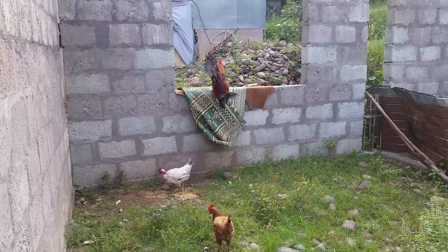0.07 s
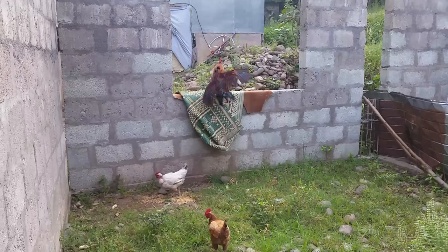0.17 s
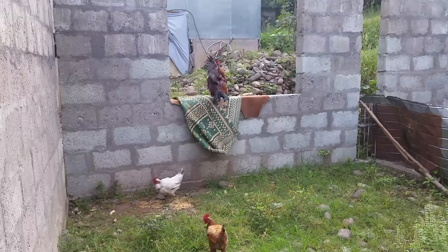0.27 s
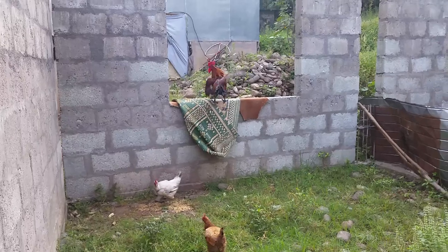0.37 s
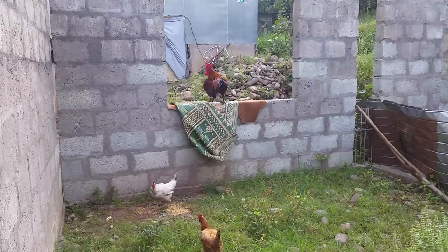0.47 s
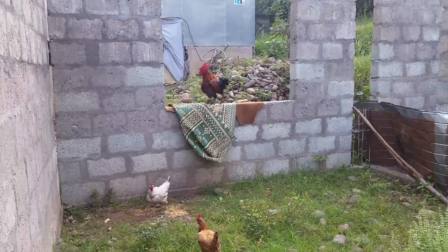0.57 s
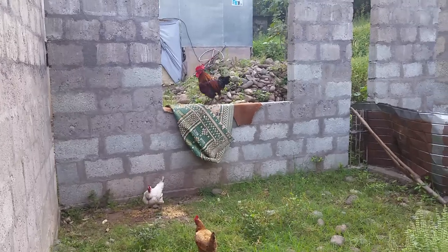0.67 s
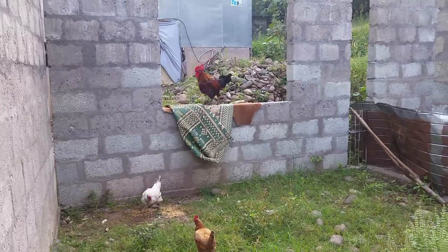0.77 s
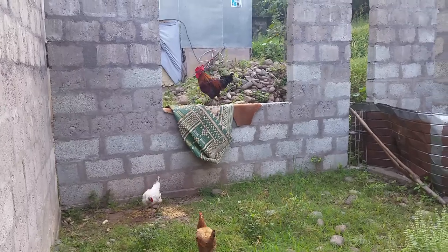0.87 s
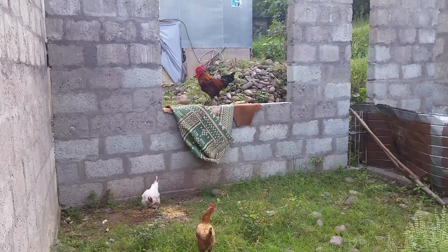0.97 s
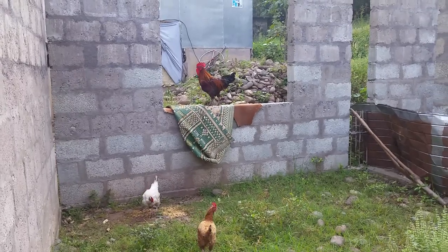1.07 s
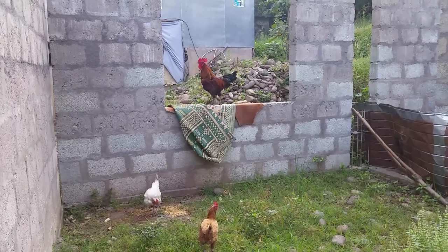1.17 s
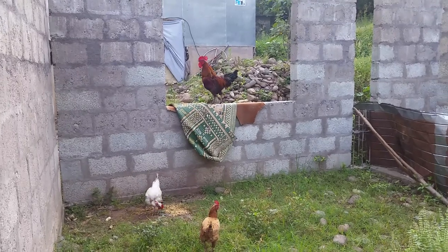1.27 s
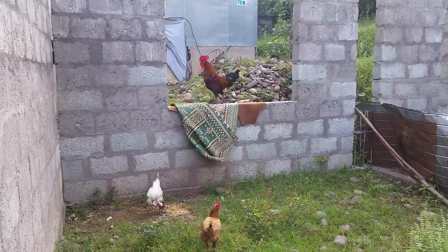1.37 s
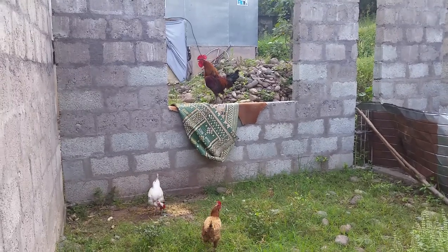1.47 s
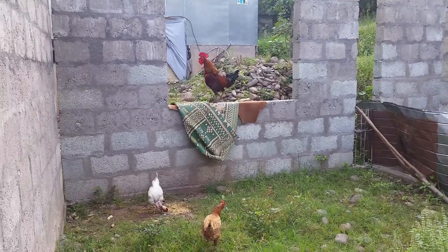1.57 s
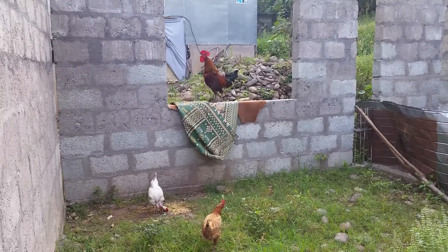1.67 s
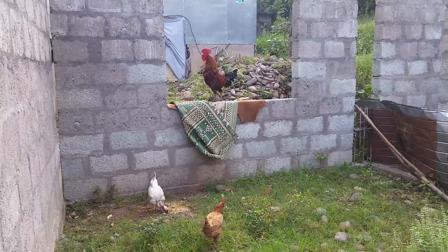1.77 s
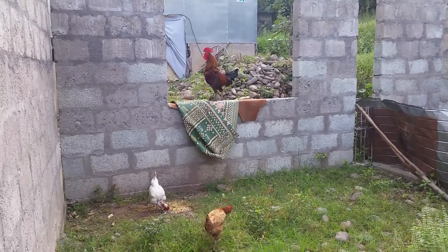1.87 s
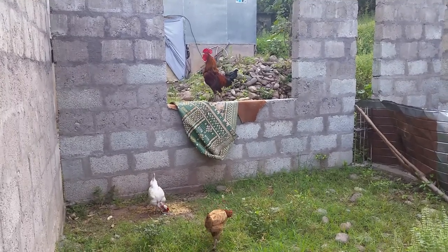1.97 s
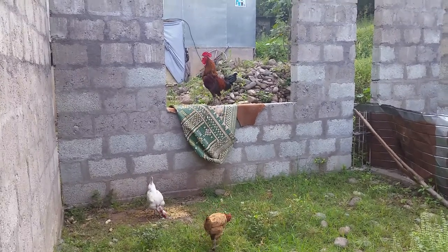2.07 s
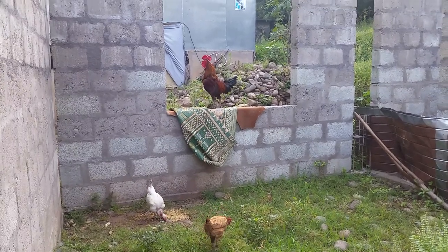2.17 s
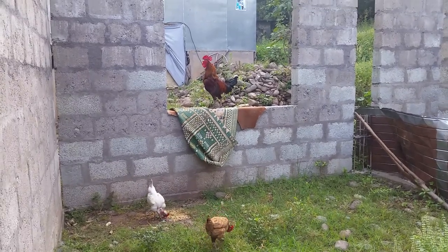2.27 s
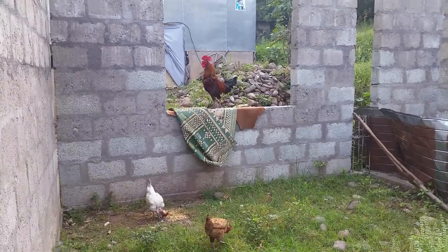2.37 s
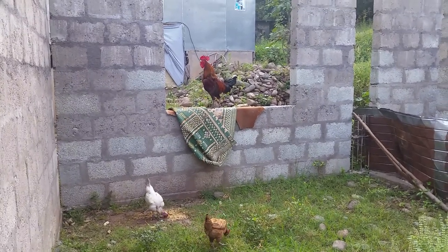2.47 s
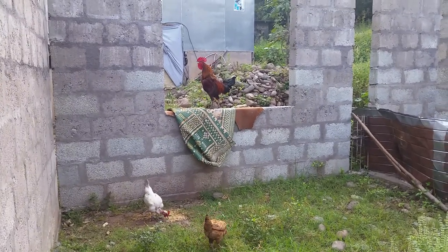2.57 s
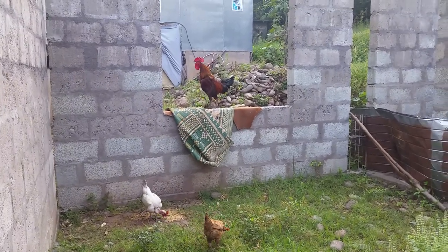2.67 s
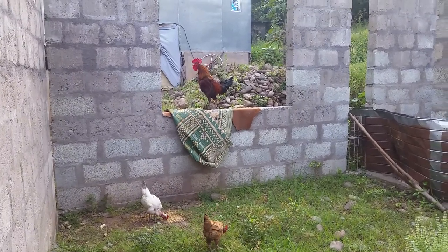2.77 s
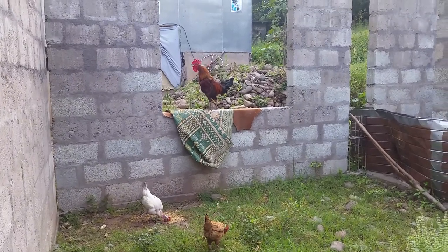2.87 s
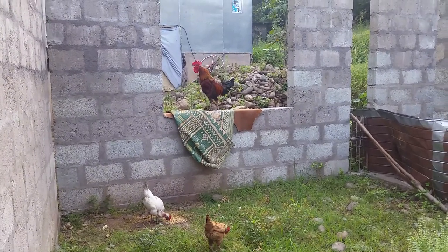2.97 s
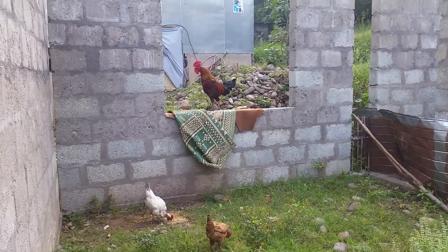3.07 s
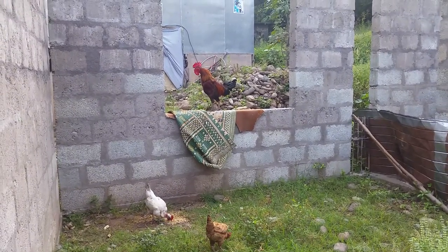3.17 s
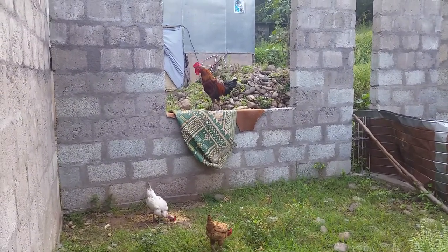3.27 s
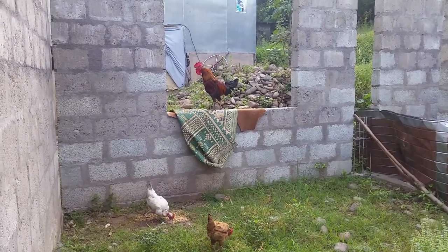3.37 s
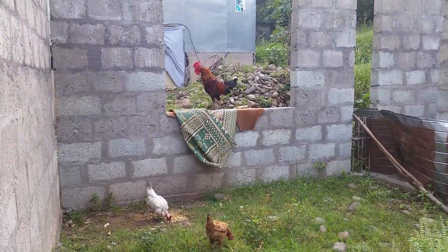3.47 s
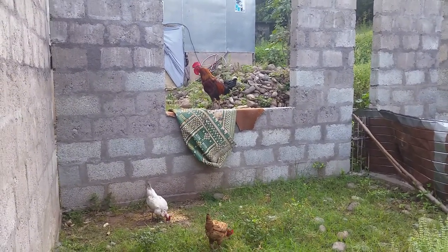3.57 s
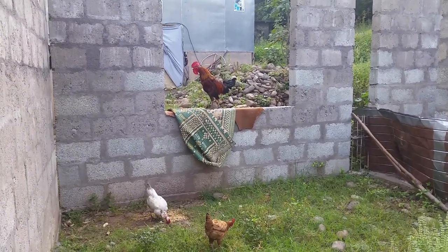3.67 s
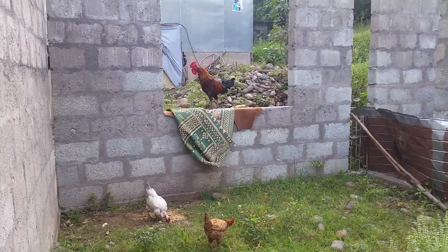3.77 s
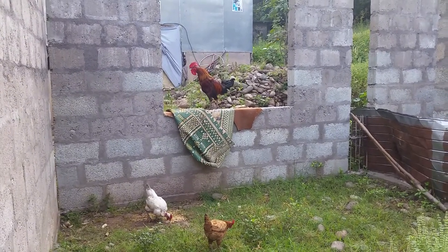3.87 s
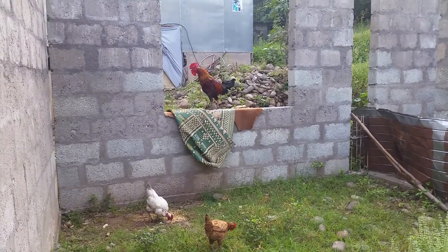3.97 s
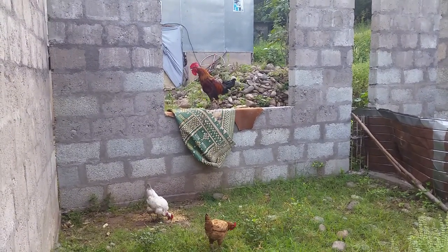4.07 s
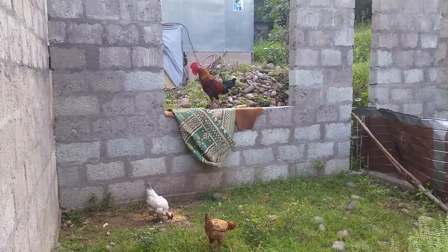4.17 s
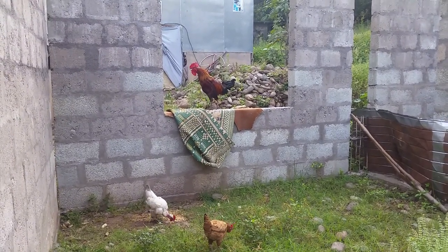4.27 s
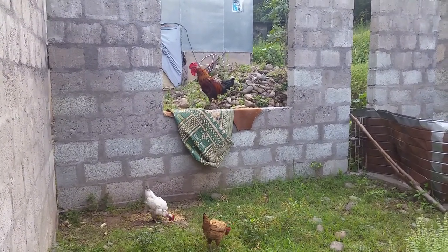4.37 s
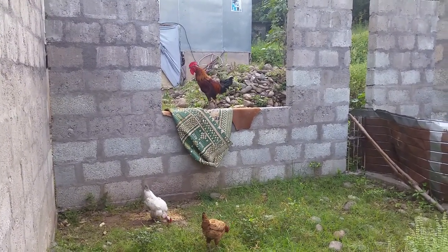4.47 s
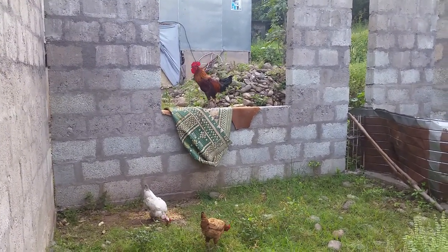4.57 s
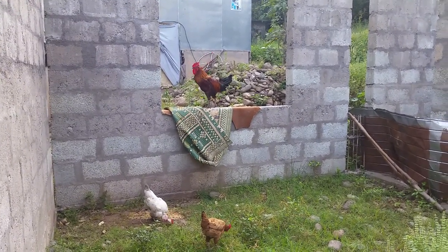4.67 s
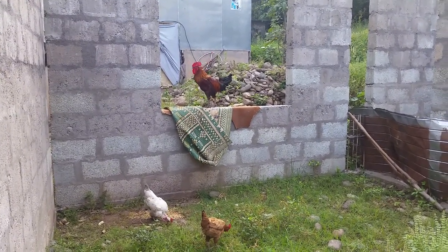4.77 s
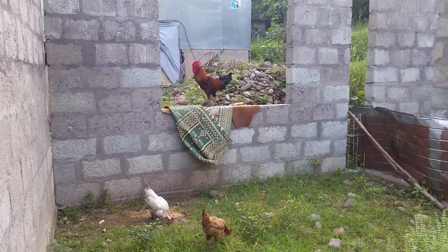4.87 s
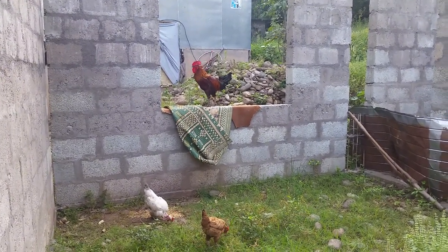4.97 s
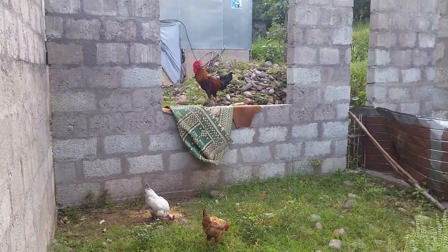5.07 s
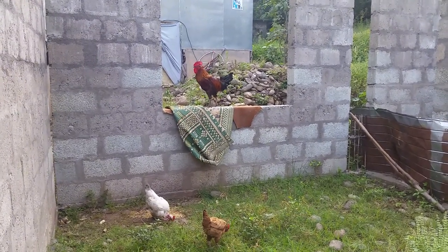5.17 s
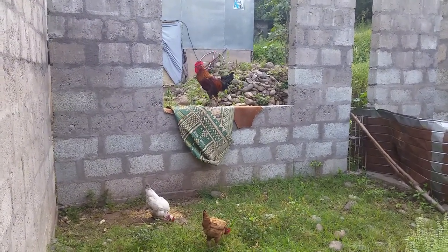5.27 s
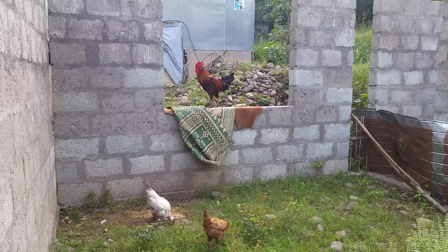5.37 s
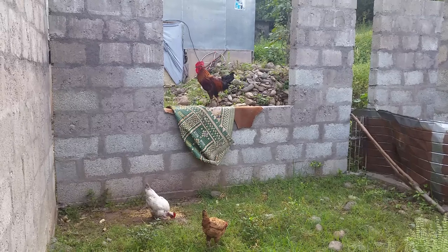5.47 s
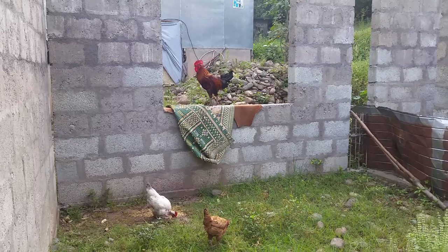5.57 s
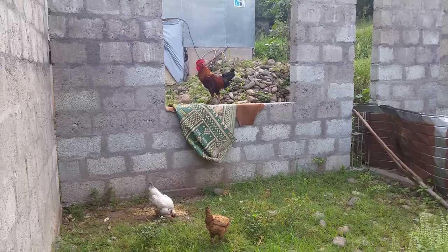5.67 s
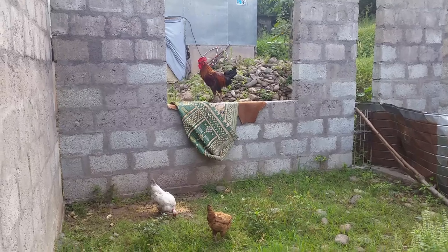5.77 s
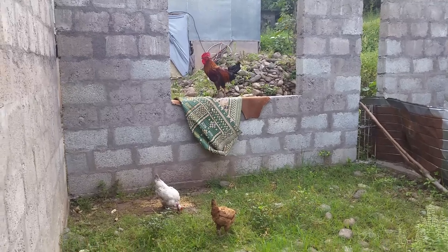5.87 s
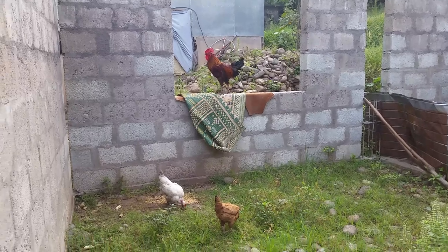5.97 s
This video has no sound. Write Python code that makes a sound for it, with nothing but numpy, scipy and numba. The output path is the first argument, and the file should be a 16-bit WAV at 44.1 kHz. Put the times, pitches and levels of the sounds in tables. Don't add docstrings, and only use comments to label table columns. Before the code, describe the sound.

Soft feather slaps, a short pause, then one loud hoarse rooster crow that rises, holds, sinks and gasps, echoing briefly off bare block walls.

```python
import sys
import numpy as np
from scipy import signal
from scipy.fft import rfft, irfft, next_fast_len
from scipy.io import wavfile
from scipy.ndimage import uniform_filter1d, minimum_filter1d, map_coordinates
from numba import njit

SR = 44100
rng = np.random.default_rng(int(sys.argv[2]) if len(sys.argv) > 2 else 0)


def to_wav(s):
    ch = np.atleast_2d(s).T
    pcm = np.round(np.clip(ch, -1, 1) * 32767)
    wavfile.write(sys.argv[1], SR, pcm.astype(np.int16))


def gain_from_db(level_db):
    decades = np.asarray(level_db, float) / 20
    return 10 ** decades


N = 265349
TIME = np.arange(N) / SR


def curve(table, column, off=-120.):
    s, v = np.array(table)[:, 0], np.array(table)[:, column]
    return np.interp(TIME, np.r_[s[0] - .006, s, s[-1] + .006], np.r_[off, v, off])


def pitch_curve(table):
    return np.interp(TIME, *np.array(table)[:, :2].T)


def smooth_amp(db, size):
    return uniform_filter1d(gain_from_db(db), size=size)


def span(start, end, size):
    return uniform_filter1d(1. * (TIME > start) * (TIME < end), size=size)


def unit(x):
    return x / np.sqrt(np.mean(x ** 2))


def walk(rate):
    hold = int(SR / rate)
    levels = np.repeat(rng.standard_normal(N // hold + 1), hold)
    return unit(uniform_filter1d(levels, hold)[:N])


def colour(x, gain):
    size = next_fast_len(N)
    hz = np.arange(size // 2 + 1) * SR / size
    return irfft(rfft(x, size) * gain(hz), size)[..., :N]


def ring(x, gain):
    size = next_fast_len(N)
    hz = np.arange(size // 2 + 1) * SR / size
    cepstrum = irfft(np.log(gain(hz) + 1e-6), size)
    cepstrum[1:size // 2] *= 2
    cepstrum[size // 2 + 1:] = 0
    return irfft(rfft(x, size) * np.exp(rfft(cepstrum)), size)[:N]


def spectrum(table):
    hz, db = np.transpose(table)
    return lambda f: gain_from_db(np.interp(np.log(f + 1), np.log(hz), db))


def tract(hz, modes):
    return np.sqrt(sum(gain_from_db(db) ** 2 / (1 + (2 * (hz - f) / w) ** 6) for f, w, db in modes))


def pipe(hz, modes):
    low_hz, high_hz, leak_db = 570, 3350, -24
    peaks = np.sqrt(sum(gain_from_db(db) ** 2 / (1 + (2 * (hz - f) / w) ** 2) ** 2 for f, w, db in modes))
    low = 1 / np.sqrt(1 + (low_hz / (hz + 1)) ** 24) + gain_from_db(leak_db) * (hz > 250)
    return peaks * low / np.sqrt(1 + (hz / high_hz) ** 12)


@njit
def fire(hz, scatter, chance):
    pulses, phase, cycle = np.zeros(len(hz) + 1), 0., 0
    for i in range(len(hz)):
        step = hz[i] * np.exp(scatter[i] * chance[cycle, 0]) / SR
        phase += step
        if phase >= 1:
            phase, cycle = phase - 1, cycle + 1
            size = np.exp(scatter[i] * chance[cycle, 1])
            early = min(phase / step, 1.)
            pulses[i] += size * early
            pulses[i + 1] += size * (1 - early)
    return pulses[:-1]


# f/Hz, level/dB (per Hz)
COUNTRY_HUSH = [(15, -57), (25, -18.5), (37, -16), (94, -3), (165, -1.5), (228, -2), (380, -2), (617, -2.5),
                (1060, -6.5), (1180, -6), (1960, -13.5), (2440, -16), (7550, -36.5), (15600, -27.5)]


def hush():
    base_db, settle_db, settle_s = -67, 4, 0.49
    lift_db, lift_from_s, lift_rise_s, lift_until_s, lift_close_s = 10, 1.5, 0.66, 5.377, 0.5
    mid, side = colour(rng.standard_normal((2, N)), spectrum(COUNTRY_HUSH))
    low = colour(mid, lambda f: (f > 60) & (f < 300))
    opening = 1 - np.exp(-np.maximum(TIME - lift_from_s, 0) / lift_rise_s)
    lift = opening * np.clip((lift_until_s - TIME) / lift_close_s, 0, 1)
    flicker_db = 0.4 * walk(5.6)
    level_db = base_db + settle_db * np.exp(-TIME / settle_s) + lift_db * lift + flicker_db
    gain = gain_from_db(level_db) / np.std(low)
    side = colour(side, spectrum([(100, -50), (1000, -32), (5000, -20)]))
    dull = spectrum([(25, -9), (55, 0), (2000, 0), (5000, -3), (9000, -11), (15000, -5)])
    return colour(gain * (mid + side * np.array([[1], [-1]])), dull)


@njit
def walls(x, lags, gain, damp):
    line, soft, out = np.zeros((8, 4096)), np.zeros(8), np.zeros((2, len(x)))
    for i in range(len(x)):
        total = 0.
        for k in range(8):
            soft[k] += (1 - damp) * (gain[k] * line[k, (i - lags[k]) & 4095] - soft[k])
            total += soft[k]
            out[k % 2, i] += soft[k]
        for k in range(8):
            line[k, i & 4095] = x[i] + soft[k] - total / 4
    return out


def wall_echo(bird):
    t60_s, damp, level_db = .29, .07, -19
    lags = rng.integers(500, 2600, 8)
    left, right = walls(bird + 1e-18, lags, gain_from_db(-60 * lags / SR / t60_s), damp)
    echo = left + right + .06 * (left - right) * np.array([[1], [-1]])
    return gain_from_db(level_db) * echo


# t/s, length/s, f/Hz, level/dB
BUSH_WHISTLE = (5.56, .19, 2400, -71)


def far_bird():
    start_s, length_s, hz, db = BUSH_WHISTLE
    phase = 2 * np.pi * np.cumsum(hz * (1 + .04 * walk(200) + .015 * walk(30))) / SR
    swell = np.sin(np.pi * np.clip((TIME - start_s) / length_s, 0, 1))
    return np.sqrt(2) * gain_from_db(db) * swell * np.cos(phase)


# t/s, peak level/dB
WING_SLAPS = [
    (0, -31.5),
    (0.08, -44),
    (0.176, -24),
    (0.29, -33.5),
    (0.346, -40),
    (0.426, -46),
    (0.625, -34),
]
# t/s, peak level/dB
CLAW_TICK = [
    (0.158, -40),
]


def wings():
    swell_s, dull_hz = 0.0122, 960
    air = colour(rng.standard_normal(N), lambda f: tract(f, [(dull_hz, 1.8 * dull_hz, 0)]))
    air = unit(air)
    out = np.zeros(N)
    for s, db in WING_SLAPS:
        swell = np.exp(-.5 * ((TIME - s - swell_s / 2) / swell_s) ** 2)
        out += gain_from_db(db - 21.0) * swell * air
    for s, db in CLAW_TICK:
        click = np.exp(-((TIME - s - .001) / 0.0004) ** 2)
        out += gain_from_db(db) * click * np.sin(2 * np.pi * 1400 * (TIME - s))
    return out


# t/s, level/dB
INDRAW_LEVEL = [
    (4.458, -33),
    (4.472, -33),
    (4.5, -41.5),
    (4.6, -40),
    (4.686, -38.5),
    (4.82, -43),
    (5.04, -48),
    (5.29, -71.5),
]
# f/Hz, width/Hz, level/dB
INDRAW_MODES = [(420, 90, -9), (690, 120, 4), (850, 300, -7), (1080, 160, -6), (1700, 800, -20),
                (3000, 2000, -32), (5500, 3000, -42), (13000, 3000, -42)]


def indraw():
    flaps = fire(np.full(N, 75.), np.ones(N), rng.standard_normal((N // 40, 2)) * [.25, .25])
    gate = unit(signal.lfilter([1], [1, -np.exp(-1 / (.004 * SR))], flaps))
    air = (5 + gate) * rng.standard_normal(N)
    scale = np.std(colour(air, lambda f: tract(f, INDRAW_MODES)))
    low = colour(air, lambda f: tract(f, INDRAW_MODES[:5])) / scale
    high = colour(air, lambda f: tract(f, INDRAW_MODES[5:])) / scale
    level_db = curve(INDRAW_LEVEL, 1)
    return gain_from_db(level_db) * low + smooth_amp(np.minimum(level_db, -39.0), 2200) * high


SYRINX_KINDS = {"clean": (.02, .04), "husky": (.045, .08), "lock": (.13, 0), "chaos": (.62, 0),
                "ripple": (.06, .12), "beat": (.14, .5), "broken": (.3, .22), "doubled": (.16, .28)}
# t/s, kind, level/dB (share of in-between pulses)
SYRINX_FLIPS = [(0, "chaos", 0.5), (1.666, "broken", -3.5), (1.694, "lock", -8), (1.714, "chaos", -1),
                (1.822, "chaos", 0), (1.968, "broken", -1.5), (2.008, "lock", -8.5), (2.052, "chaos", 0),
                (2.11, "chaos", -0.5), (2.198, "lock", -10.5), (2.266, "chaos", -2), (2.498, "lock", -10),
                (2.551, "chaos", 0), (2.642, "broken", -2.5), (2.672, "lock", -21),
                (2.695, "ripple", -24.5), (2.742, "beat", -22.5), (2.78, "beat", -15),
                (2.839, "clean", -51), (2.99, "husky", -47.5), (3.108, "clean", -24), (3.125, "clean", -7),
                (3.152, "doubled", -8.5), (3.237, "doubled", -3), (3.292, "chaos", -11.5),
                (3.306, "clean", -52.5), (3.7, "husky", -38), (3.861, "clean", -35.5), (3.96, "husky", -29),
                (4.054, "broken", -1.5), (4.077, "husky", -23.5), (4.16, "clean", -39),
                (4.33, "husky", -30.5), (4.451, "broken", -6.5)]


def flips(values):
    now = np.searchsorted([row[0] for row in SYRINX_FLIPS], TIME, side="right") - 1
    return uniform_filter1d(np.array(values, float)[np.maximum(now, 0)], size=int(.015 * SR))


# t/s, f/Hz, level/dB
FIRST_NOTE = [
    (1.643, 571, -52.5),
    (1.652, 575.1, -34),
    (1.693, 567.2, -30),
    (1.701, 574.7, -19.5),
    (1.74, 631.3, -17.5),
    (1.81, 608.1, -17),
    (1.826, 606.3, -20),
    (1.85, 607.3, -32),
    (1.915, 609.7, -40.5),
]
# t/s, f/Hz, level/dB
SECOND_NOTE = [
    [(1.947, 608, -22.5), (1.975, 639, -17), (2.03, 670, -12.5), (2.06, 629, -15), (2.094, 606.8, -20),
     (2.12, 735.3, -19), (2.19, 748, -13.5), (2.198, 717.5, -9)],
    [(2.204, 692.3, -10.5), (2.262, 690, -10.5), (2.285, 744, -14.5), (2.347, 688.5, -13),
     (2.43, 745, -14.5), (2.49, 678.2, -14.5), (2.53, 662.4, -10.5), (2.565, 670, -19),
     (2.63, 649.4, -39.5)],
]
# t/s, f/Hz, level/dB
THIRD_NOTE = [
    (2.638, 579.8, -33),
    (2.656, 586.5, -17.5),
    (2.678, 643, -12.5),
    (2.7, 660, -11),
    (2.797, 665.6, -10),
    (2.828, 647.5, -9.5),
]
# t/s, f/Hz, level/dB
FOURTH_NOTE = [
    (2.829, 745, -11.5),
    (2.865, 724, -9.5),
    (2.982, 725.1, -9.5),
    (2.998, 717.4, -12),
    (3.021, 716, -10),
    (3.148, 709.5, -10.5),
    (3.165, 705.4, -14),
    (3.285, 702.3, -12.5),
    (3.299, 678, -12.5),
]
# t/s, f/Hz, level/dB
LONG_NOTE = [
    (3.302, 643, -11),
    (3.31, 641.7, -12),
    (3.6, 631.5, -11),
    (3.854, 609, -12),
    (4.026, 589.1, -12),
    (4.049, 582, -12.5),
]
# t/s, f/Hz, level/dB
LAST_NOTE = [
    (4.051, 512.6, -18),
    (4.093, 504, -14),
    (4.146, 512.7, -13.5),
    (4.241, 496.9, -13),
    (4.262, 497.2, -15),
    (4.329, 486.9, -17.5),
    (4.408, 482.8, -14.5),
    (4.437, 474.4, -14),
    (4.464, 410.3, -25),
]
SYLLABLES = [FIRST_NOTE, *SECOND_NOTE, THIRD_NOTE, FOURTH_NOTE, LONG_NOTE, LAST_NOTE]
FULL_DB = -12
BREATH_LEVEL = [-56, -51.5, -50, -55, -67, -68, -58]
# f/Hz, level/dB
BREATH_COLOUR = [(1800, -30), (2300, 3), (3100, 4.5), (3700, -9.5), (4500, -15.5), (5300, -18.5),
                 (7000, -37)]
# from t/s, until t/s, f/Hz, width/Hz, level/dB
BEAK_RINGING = [
    (2.06, 2.566, 6020, 250.3, -68),
    (2.15, 2.561, 5950, 350.5, -69),
    (2.702, 2.874, 6110, 255, -64),
    (3.13, 3.313, 6158, 199, -63.5),
]


def breath(air, pulses, beat):
    slope, linger_s = 0.63, 0.04
    flow = 0
    for part, db in zip(SYLLABLES, BREATH_LEVEL):
        flow = flow + gain_from_db(db + slope * (curve(part, 2) - FULL_DB))
    linger = np.exp(-1 / (linger_s * SR))
    hiss = unit(colour(air[::-1], spectrum(BREATH_COLOUR)))
    out = signal.lfilter([1 - linger], [1, -linger], flow) * hiss
    for start, end, hz, width, db in BEAK_RINGING:
        rung = unit(colour(pulses, lambda f: tract(f, [(hz, width, 0)]) ** 2))
        out += gain_from_db(db) * span(start, end, 1300) * (1 + 0.28 * beat) * rung
    return out


def hoarse_trace(air):
    hoarse = unit(colour(air, lambda f: pipe(f, [(1420, 750, -8.0), (1030, 94, -4.0)])))
    return gain_from_db(-46) * (TIME > 2.8) * (TIME < 4.45) * hoarse


# t/s, f/Hz, level/dB
LONE_HALF = [
    [(2.63, 1710, -34.5), (2.645, 1358, -26.5), (2.654, 1097, -24.5), (2.662, 1141, -21),
     (2.674, 1227, -31.5)],
    [(2.652, 1783, -27.5), (2.675, 1894, -18.5), (2.72, 1925, -29), (2.79, 1866, -25.5),
     (2.825, 1820, -25.5), (2.86, 1800, -38.5)],
]
# t/s, f/Hz, level/dB
CHAOS_STRAYS = [
    [(1.947, 1247, -24), (1.957, 1073, -20), (1.972, 1195, -21.5), (1.992, 1242, -26.5)],
    [(1.948, 1812, -21.5), (1.968, 1827, -28), (1.988, 1900, -30), (1.996, 1880, -29.5)],
    [(1.965, 1576, -22.5), (2.0, 1639, -20.5), (2.022, 1656, -22)],
    [(2.043, 1949, -25), (2.055, 1875, -20), (2.075, 1830, -24.5)],
    [(2.044, 959, -22), (2.054, 950, -11.5), (2.062, 970, -23.5)],
    [(2.11, 1560, -21.5), (2.135, 1500, -22), (2.158, 1520, -22)],
    [(2.158, 1767, -27), (2.18, 1873, -20), (2.21, 1971, -24.5)],
    [(2.062, 1221, -24.5), (2.085, 1095, -16), (2.12, 1130, -23), (2.155, 1184, -24.5), (2.183, 1130, -20)],
    [(2.186, 1487, -21), (2.198, 1460, -15.5), (2.212, 1353, -25.5)],
    [(2.266, 1445, -22), (2.276, 1520, -16), (2.305, 1489, -18.5), (2.36, 1311, -24.5)],
    [(2.4, 1420, -23), (2.424, 1450, -15.5), (2.44, 1634, -20), (2.475, 1589, -26.5)],
    [(2.545, 1830, -22.5), (2.565, 1948, -24)],
]
# t/s, f/Hz, level/dB
FIRST_STRAYS = [
    [(1.644, 1850, -43.5), (1.66, 1612, -41), (1.69, 1655, -34)],
    [(1.652, 1177, -38), (1.662, 1130, -32), (1.692, 1136, -29), (1.703, 1160, -20), (1.716, 1170, -26)],
    [(1.71, 1423, -26), (1.725, 1538, -31.5), (1.77, 1500, -20), (1.8, 1467, -25), (1.83, 1566, -19.5),
     (1.842, 1550, -27.5)],
    [(1.798, 1170, -21), (1.808, 1130, -23), (1.818, 1080, -30.5), (1.835, 1152, -23), (1.85, 1137, -41),
     (1.915, 1135, -41)],
    [(1.662, 2850, -54), (1.7, 2900, -46), (1.75, 2800, -50), (1.8, 2950, -46), (1.84, 3000, -46),
     (1.87, 2950, -56)],
]
# t/s, f/Hz, level/dB
THIRD_STRAYS = [
    [(2.686, 2600, -46), (2.715, 2680, -41), (2.746, 2640, -44)],
    [(2.83, 642, -17), (2.842, 636, -20), (2.858, 630, -30)],
]
# t/s, f/Hz, level/dB
LAST_STRAYS = [
    [(4.052, 600, -24.5), (4.064, 643, -18.5), (4.078, 590, -30.5)],
    [(4.054, 1903, -21), (4.066, 1786, -25), (4.082, 1730, -30.5)],
    [(4.452, 1349, -31), (4.464, 1195, -27), (4.478, 1130, -34)],
    [(4.456, 897.6, -32), (4.47, 776, -29.5), (4.488, 747, -45)],
    [(4.462, 1877, -31), (4.49, 1930, -48), (4.525, 1970, -46)],
    [(4.442, 2935, -54), (4.47, 2920, -59), (4.51, 2880, -56.5)],
]


def lone_line(part, bend):
    phase = 2 * np.pi * np.cumsum(pitch_curve(part) * (1 + bend)) / SR
    return np.sqrt(2) * smooth_amp(curve(part, 2), 90) * np.cos(phase)


def second(beat):
    catch, arch_part = LONE_HALF
    locked = np.clip((TIME - 2.68) / .04, 0, 1)
    arch = lone_line(arch_part, .012 * walk(300) - .06 * locked * np.roll(beat, 480))
    arch = arch * (1 + .85 * locked * np.roll(beat, 220))
    jitter, flutter = .021 * walk(400), 1 + .45 * np.tanh(walk(90))
    strays = CHAOS_STRAYS + FIRST_STRAYS + THIRD_STRAYS + LAST_STRAYS
    stray = sum(lone_line(part, jitter) for part in strays)
    return lone_line(catch, .018 * walk(300)) + arch + flutter * stray


# f/Hz, width/Hz, level/dB
WINDPIPE_MODES = [
    [(690, 100, -5.5), (830, 67, -11), (1130, 130, 3), (1420, 120, -5), (1572, 79, 4.5), (1830, 29, 0.5),
     (2270, 200, -27.5), (2916, 35, -19)],
    [(393, 280, -16), (716, 140, 3.5), (984, 87, -9), (1127, 310, 2.5), (1457, 150, 5), (1679, 38, 5),
     (1844, 84, 5.5), (2055, 45, -9.5), (2860, 76, -23)],
]


def rasp(pulses, share, chaos):
    out = 0
    for parts, modes in zip((SYLLABLES[:1], SYLLABLES[1:]), WINDPIPE_MODES):
        push = uniform_filter1d(sum(gain_from_db(curve(part, 2)) for part in parts), size=90) * share
        scale = np.std(colour(pulses, lambda f: pipe(f, modes)))
        out = out + ring(pulses * push, lambda f: pipe(f, modes)) / scale
    strain = np.gradient(uniform_filter1d(walk(16), size=1500))
    bend = np.cumsum(chaos * strain) * .0011 * SR
    return map_coordinates(out, [np.arange(N) + bend], order=3)


# f/Hz, level/dB
PASS_BAND = [
    [(575, -31), (620, -16.5), (1150, -21), (1250, -34), (1800, -31)],
    [(610, -21), (680, -12), (750, -17), (1330, -16), (1390, -19.5), (1500, -19.5), (2000, -36.5),
     (2200, -49.5)],
    [(600, -27.5), (640, -6.5), (665, -7.5), (703, -16.5), (720, -22), (1320, -18.5), (1405, -14),
     (1432, -10), (1980, -33), (2150, -50), (2178, -60)],
    [(588, -24), (612, -10.5), (1190, -17), (1204, -38.5), (1218, -14), (1280, -22), (1745, -36.5),
     (1772, -17.5), (1800, -16), (1920, -27.5)],
    [(870, -29.5), (966, -38), (975, -22.5), (1020, -18), (1450, -17.5), (1520, -13.5), (1925, -15.5),
     (1945, -17), (1980, -31.5), (2036, -38.5)],
]


def strong_lines(pose, first, pitch):
    gain = spectrum(sorted(PASS_BAND[pose]))
    lines = np.array([gain((first + k) * pitch) for k in range(3)])
    return lines / np.sqrt(np.sum(lines ** 2, axis=0))


# f/Hz, level/dB
FIRST_BEAK = [(1350, -58), (2300, -14.5), (2950, -1.5), (3350, -33), (4620, -29), (5420, -21), (5900, -26),
              (6420, -43), (6950, -21.5), (7600, -43), (8300, -20), (8900, -32), (10200, -28.5),
              (10900, -54), (12100, -30.5), (13600, -48.5), (15600, -50)]
# f/Hz, level/dB
BEAK_COLOURS = [
    [(1350, -28.5), (2300, -4), (2530, -3.5), (3120, -1.5), (3600, -11.5), (4660, -36), (5470, -35),
     (6020, -29.5), (6350, -61.5), (6950, -63.5), (7200, -25.5), (8360, -19.5), (11200, -22.5),
     (12100, -36.5), (13300, -24), (14100, -38.5), (15600, -45.5)],
    [(1350, -53.5), (2300, -27), (2550, -10), (2790, -12.5), (2900, -1), (3300, -20), (5000, -49.5),
     (5720, -42), (6150, -23), (6500, -38.5), (7060, -52), (7800, -45.5), (8430, -21.5), (8700, -14.5),
     (10200, -32), (11000, -53.5), (11800, -36), (14000, -41.5), (14900, -28.5), (15600, -38.5)],
    [(1350, -26.5), (2420, -20.5), (2560, 1), (3250, -5), (4850, -32), (5400, -20), (5650, -15.5),
     (5980, -3), (6120, -13), (6280, -25), (7350, -47), (8770, -3.5), (9660, -9.5), (10100, -26),
     (10700, -39.5), (11700, -19.5), (12700, -16), (13400, -12), (15600, -29)],
    [(1350, -46.5), (2420, -13), (2880, -7.5), (2970, 2), (3350, -38), (4810, -36.5), (5870, -9),
     (6900, -37), (7350, -24.5), (8230, -31), (9060, -15.5), (11300, -40), (12200, -21), (13100, -32),
     (14000, -19.5), (15600, -47.5)],
]
BEAK_SCATTER = [.12, .5, .014, .012, .014]


def upper_harmonics(pose, first, live, hz, phase, drift, slip, flutter, push):
    blur = 0.045 * drift + 2 * np.pi * np.cumsum(hz * 0.23 * BEAK_SCATTER[pose] * slip[live]) / SR
    orders = np.arange(first + 3, 33)[:, None]
    patchy = gain_from_db(4.5 * np.array([np.roll(flutter, 9001 * k)[live] for k in range(len(orders))]))
    lines = patchy * np.cos(orders * (phase + blur) + .12 * orders ** 2)
    ladder = np.zeros(N)
    ladder[live] = np.sum((orders * hz < 15700) * lines, axis=0)
    beak = spectrum(([FIRST_BEAK] + BEAK_COLOURS)[pose])
    top = np.std(colour(ladder, lambda f: beak(f) * (f > 5000))[live])
    weak_band = spectrum([(3250, 0), (3550, -9), (4900, -9), (5300, 0)])
    return colour(ladder * push, lambda f: beak(f) * weak_band(f)) / top


BEAK_MOVES = [1.92, 2.64, 3.295, 4.055]
# t/s, level/dB
LAST_FUNDAMENTAL = [
    (4.06, -35),
    (4.09, -40),
    (4.178, -41.5),
    (4.24, -34.5),
    (4.3, -34),
    (4.364, -41.5),
    (4.432, -43.5),
    (4.452, -38.5),
    (4.47, -47.5),
]


def tone(note, first, top_db, clear, chaos, slip, flutter, wobble, loose):
    strain, slack_db, slack_slope, woken_s = 0.7, -17.5, 2.4, 1.72
    live = slice(int((note[0][0] - .01) * SR), int((note[-1][0] + 0.0074) * SR))
    pose = np.searchsorted(BEAK_MOVES, note[0][0] + .01)
    pitch = pitch_curve(note)[live]
    hz = pitch * (1 + wobble[live])
    phase = 2 * np.pi * np.cumsum(hz) / SR
    drift = 2 * np.pi * np.cumsum(hz * (chaos * slip)[live]) / SR
    effort_db = curve(note, 2)
    level = smooth_amp(effort_db, 260) * clear
    out = np.zeros(N)
    for k, weight in enumerate(strong_lines(pose, first, pitch)):
        sway = 1 + np.clip(.07 + 1.2 * chaos + loose * (k == 0), 0, 1) * np.tanh(flutter[k])
        line = np.cos((first + k) * (phase + 0.049 * drift) - 2.0 * k)
        out[live] += np.sqrt(2) * weight * (level * sway)[live] * line
    out = colour(out, lambda f: pipe(f, [(1000, 1e5, 0)]))
    slack = slack_slope * np.minimum(effort_db - slack_db, 0) * (TIME > woken_s)
    push = smooth_amp(top_db + strain * (effort_db - FULL_DB) + slack, 260)
    out += upper_harmonics(pose, first, live, hz, phase, drift, slip, flutter[3], push)
    if first > 1:
        root_db = curve(LAST_FUNDAMENTAL, 1)[live] + 2 * flutter[0][live]
        out[live] += np.sqrt(2) * gain_from_db(root_db) * np.cos(phase)
    return out


TOP_LEVEL = [-60, -55.5, -53, -57.5, -51, -58.5, -47.5]
TOP_SAG = [2, 17, 3, 10.5, 5, -11.5, 10]
ROOT_LOOSENESS = [0, 0, 0, 0, .6, 0, 0]


def clear_voice(share, chaos, slip, wobble):
    flutter = [walk(80), walk(110), walk(100), np.tanh(walk(30))]
    clear = np.sqrt(1 - share ** 2)
    out = 0
    for note, db, sag, loose in zip(SYLLABLES, TOP_LEVEL, TOP_SAG, ROOT_LOOSENESS):
        first = 2 if note is LAST_NOTE else 1
        top_db = db + sag * (TIME - (note[0][0] + note[-1][0]) / 2)
        out = out + tone(note, first, top_db, clear, chaos, slip, flutter, wobble, loose)
    return out


# from t/s, until t/s
THIN_SPAN = (2.2, 2.48)
# f/Hz, level/dB
THIN_COLOUR = [(540, -20), (600, -8), (655, 0), (880, 0), (1100, -4), (1320, 0)]


def thin_low_voice(call):
    thin = span(*THIN_SPAN, 900)
    return call + thin * (colour(call, spectrum(THIN_COLOUR)) - call)


def crow():
    throb_hz, throb_peak_s = 41.3, 2.797
    chaos, depth = (flips([SYRINX_KINDS[row[1]][k] for row in SYRINX_FLIPS]) for k in range(2))
    share = flips([gain_from_db(min(row[2], -.3)) for row in SYRINX_FLIPS])
    slip = walk(700)
    chaos = chaos * np.clip(1 + .45 * walk(45), .35, 1.5)
    hz = pitch_curve(np.vstack(SYLLABLES))
    pulses = fire(hz / 2, chaos, rng.uniform(-1, 1, (N // 40, 2)) * [.6, .2])
    beat = np.cos(2 * np.pi * throb_hz * (TIME - throb_peak_s) + .12 * walk(20))
    throb = depth * beat
    wobble = .05 * np.roll(throb, 250) + .025 * chaos ** 2 * walk(35)
    call = clear_voice(share, chaos, slip, wobble) + rasp(pulses, share, chaos)
    air = rng.standard_normal(N)
    call = thin_low_voice(call) * (1 + throb)
    return call + second(beat) + hoarse_trace(air) + breath(air, pulses, beat)


def scene():
    bird = crow() + indraw() + wings() + far_bird()
    return bird + wall_echo(bird) + hush()


def roll_off(x):
    return signal.sosfilt(signal.butter(12, 15770, fs=SR, output="sos"), x)


# f/Hz, level/dB (left minus right)
PORT_TILT = [(300, 0), (700, -.5), (1300, -.7), (2400, -1.2), (3300, -2), (4600, -10.5), (6200, -9),
             (7500, 1.4), (15000, 1.1)]


def record(dry):
    ceiling = .86
    tilt = spectrum(PORT_TILT)
    left = colour(dry[0], lambda f: tilt(f) ** .5)
    right = colour(dry[1], lambda f: tilt(f) ** -.5)
    ports = np.array([left, right])
    peak = -minimum_filter1d(-np.abs(ports).max(axis=0), size=400)
    peak = uniform_filter1d(peak, size=400)
    mix = ports * np.minimum(1, ceiling / peak)
    return roll_off(mix)


dry = scene()
out = record(dry)
to_wav(out)
```